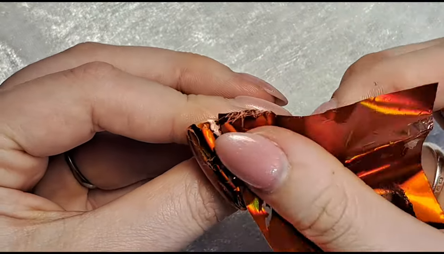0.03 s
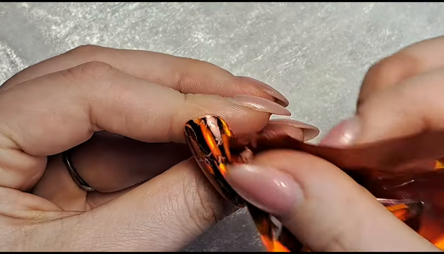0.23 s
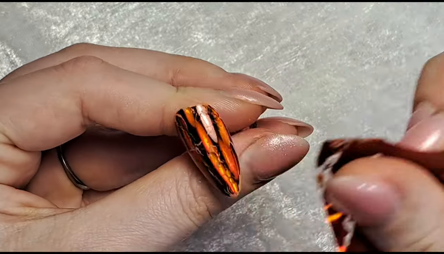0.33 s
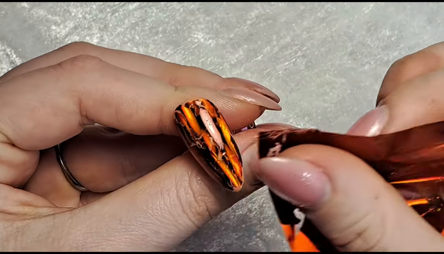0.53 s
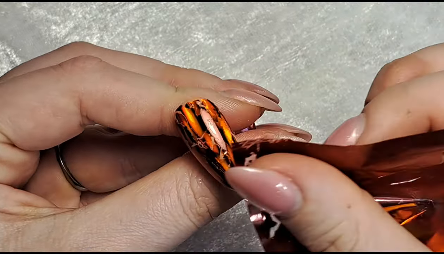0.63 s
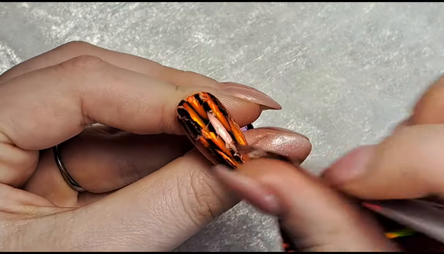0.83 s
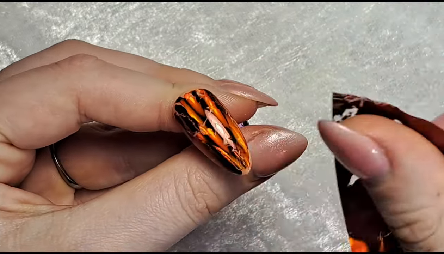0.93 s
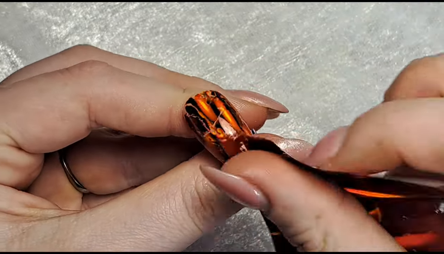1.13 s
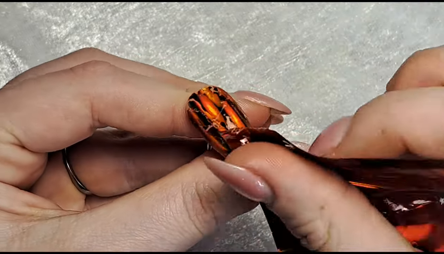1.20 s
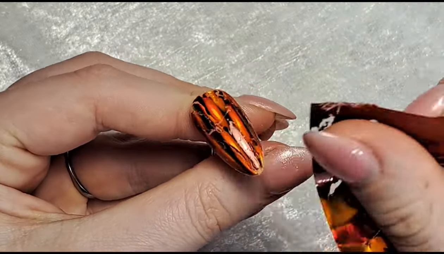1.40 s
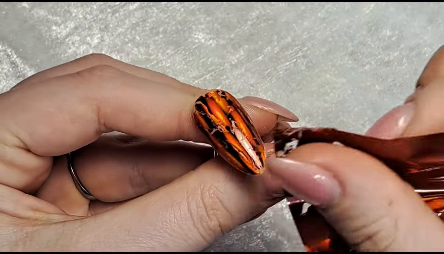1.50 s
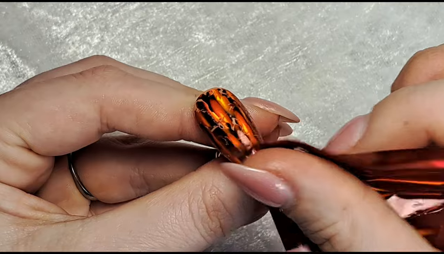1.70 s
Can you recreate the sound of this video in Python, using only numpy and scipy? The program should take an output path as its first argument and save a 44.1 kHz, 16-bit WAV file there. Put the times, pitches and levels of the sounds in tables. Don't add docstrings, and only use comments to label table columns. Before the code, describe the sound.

A thin foil strip crackles very close to a stereo microphone, pressed and lifted from a fingernail in three rounds; the first burst is loudest, later snaps are sparser, over faint hiss and low hum.

```python
import sys
import numpy as np
from scipy import signal
from scipy.fft import rfft, irfft, next_fast_len
from scipy.io import wavfile
from scipy.ndimage import uniform_filter1d, minimum_filter1d

SR = 44100
rng = np.random.default_rng(int(sys.argv[2]) if len(sys.argv) > 2 else 0)


def to_wav(s):
    ch = np.atleast_2d(s).T
    pcm = np.round(np.clip(ch, -1, 1) * 32767)
    wavfile.write(sys.argv[1], SR, pcm.astype(np.int16))


def level_to_linear(level):
    exponent = np.asarray(level, float) / 20
    return 10 ** exponent


N = 77175

# (peak time [s], peak rms level [dB], fall [ms], bass tilt
# [dB/octave])
FOIL_CREASES = [(0.0068, -49.5, 3.3, -1.5), (0.0114, -52, 1.7, -3), (0.0277, -55.5, 0.97, -1),
                (0.0882, -53, 2.8, 2.1), (0.1163, -49.5, 1.3, 1), (0.1223, -57, 1.0, -10),
                (0.1298, -43, 1.7, -1), (0.1811, -56, 0.8, -16), (0.1887, -42, 1.8, -4),
                (0.2033, -50, 1.4, 2.8), (0.2288, -38, 2.5, -1.3), (0.2314, -30, 1.5, 0.5),
                (0.2886, -45, 1.2, 4), (0.2972, -51, 0.78, -2), (0.3299, -29.5, 1.07, -0.5),
                (0.3332, -31, 1.6, 2.5), (0.3417, -30.5, 1.2, 4), (0.3447, -30.5, 2.8, 4),
                (0.3487, -36, 2, 8), (0.3558, -33, 3.7, 3.5), (0.3598, -23.8, 2.5, -3.5),
                (0.362, -20.5, 0.94, 1.72), (0.3654, -28, 0.45, 1.96), (0.469, -48, 2.5, 3),
                (0.5443, -57.1, 0.37, 3.8), (0.5972, -57, 1.5, 3.2), (0.645, -62, 0.41, 7),
                (0.7336, -44.5, 1.43, 0), (0.8283, -49, 2.8, -0.3), (0.8365, -37, 1.5, -6),
                 (0.8426, -40.5, 2.5, 3.3), (0.8444, -36, 0.26, -1.5), (0.896, -43, 0.69, -10),
                 (0.9192, -60, 0.59, -6), (0.935, -40, 2.3, -7), (0.9437, -49, 1.8, 1.5),
                 (0.9529, -29.5, 2.5, -4.5), (0.9756, -35.5, 2.1, 0.1), (1.0113, -47.5, 1.2, 2.8),
                 (1.0184, -41, 2.1, -1.5), (1.083, -50, 2.2, 1.2), (1.1075, -37, 1.0, -3.5),
                 (1.1107, -34, 0.64, -4.5), (1.1186, -44.5, 1.1, 2.9), (1.15, -54, 1.3, 3.5),
                 (1.165, -50, 0.85, -6),
                (1.248, -53.5, 2.2, -13), (1.2565, -58, 2.5, 1), (1.26, -37.5, 1.7, -4),
                (1.2625, -37.5, 0.9, 0.5), (1.2674, -44.5, 3.2, 2.5), (1.2771, -43, 3.1, -4),
                (1.3536, -42.5, 1.9, 0.2), (1.361, -45.2, 1.0, -9), (1.368, -48, 2.5, 1),
                (1.3735, -32, 0.73, -4), (1.3761, -38, 1.7, 0.1), (1.3939, -35, 2.3, -2),
                (1.3942, -36.5, 2.9, -3.5), (1.398, -32.5, 0.99, 0.5), (1.4033, -40, 1.2, 2),
                (1.53, -60.5, 0.7, 2), (1.674, -55, 3, 2.5), (1.6762, -38, 1.26, -3),
                (1.7181, -41.5, 4.6, 0.5), (1.7213, -40.5, 0.7, -5), (1.7307, -47.5, 1, -1),
                (1.7374, -33, 0.79, -7.5), (1.415, -45.5, 1.1, 2.7), (1.424, -45, 1.1, -2),
                (1.4715, -55, 1.2, -1), (1.748, -54, 1.1, -6)]
# (frequency [Hz], level [dB])
FILM_COLOUR = [(110, -33.5), (380, -8.5), (1000, -6), (1900, -9), (2800, -2.5), (3600, -2), (6000, 2.5),
               (12500, 3.5), (16000, 2.5)]
# (time [s], level [dB])
HANDLING_EFFORT = [(0, -54.5), (.07, -70), (.2, -60.5), (.31, -47), (.37, -40), (.5, -68.5), (.62, -77),
                   (.72, -76.5), (.815, -62), (.85, -58), (.96, -54), (1.06, -68), (1.22, -76), (1.28, -49),
                   (1.345, -64.5), (1.43, -61), (1.52, -69), (1.66, -89), (1.7, -54), (1.75, -65)]
# (time [s], pitch [Hz], level [dB])
FINGER_SQUEAK = [(.55, 1390, -88), (0.619, 1401, -79), (0.801, 1331, -86), (0.849, 1343, -78),
                 (.92, 1405, -71.5), (.98, 1280, -69.5), (1.041, 1386, -70.5), (1.1, 1394, -69),
                 (1.2, 1407, -85), (1.25, 1400, -115)]
# (frequency [Hz], level difference [dB])
LEFT_OVER_RIGHT = [(300, 1.5), (1000, -3.5), (2500, -7.5), (5000, -2.5), (9000, 0), (14000, 6.5)]
# (frequency [Hz], 60 dB decay time [s])
ROOM_DECAY = [(300, 0.42), (800, 0.19), (2100, 0.25), (5500, 0.19), (14600, 0.11)]
# (time [s], level [dB])
TABLE_RUMBLE = [(0.0, -75.5), (0.258, -63), (0.292, -76), (0.36, -61), (0.57, -67.5), (0.988, -57),
                (1.048, -65.5), (1.666, -69), (1.75, -64.5)]
# (frequency [Hz], width [Hz], level [dB])
TABLE_MODES = [(154.5, 26, -75), (202.7, 12.8, -78), (261.8, 64, -73), (299.6, 21.3, -77)]
# (frequency [Hz], level [dB])
LOW_NOISE = [(12, -40), (20, -26), (42, -11.5), (59, -9.5), (122, -12), (157, -25.5), (214, -3.5),
             (238, -19.5), (450, -84), (580, -88), (990, -120)]
# (frequency [Hz], level [dB])
HISS = [(210, -36), (350, -6), (411, -15), (804, -19), (1820, -24.5), (9000, -32.5), (12000, -20),
        (16000, -35)]


def at_hz(points, hz):
    table_hz, values = np.transpose(points)
    return np.interp(np.log(np.maximum(hz, 1)), np.log(table_hz), values)


def in_time(rows):
    s, values = np.transpose(rows)
    return np.interp(np.arange(N) / SR, s, values)


def rms_one(x):
    return x / np.sqrt(np.mean(x ** 2) + 1e-20)


def film(clicks, tilt_db, ripple_db):
    size = 2 * next_fast_len(len(clicks) // 2 + 512)
    hz = np.arange(size // 2 + 1) * SR / size
    patches_db = np.interp(np.sqrt(hz), np.linspace(0, np.sqrt(SR / 2), len(ripple_db)), ripple_db)
    octaves = np.log2(np.clip(hz, 900.0, 12000.0) / 8000)
    db = at_hz(FILM_COLOUR, hz) - 0.75 * tilt_db * octaves + patches_db
    both_sides_db = np.r_[db, db[-2:0:-1]]
    log_response = np.conj(signal.hilbert(both_sides_db)[:hz.size]) * np.log(10) / 20
    return irfft(rfft(clicks, size) * np.exp(log_response), size)[:len(clicks)]


def click_swarm(ms, fall_ms):
    clicks_per_ms, size_spread_db = 30.0, 1.5
    rise_share, longest_fall_ms = 0.55, 2.2
    echo_ms, echo_share = 0.71, 0.4
    present = rng.random(ms.size) < clicks_per_ms * 1000 / SR
    size_db = size_spread_db * np.minimum(rng.exponential(1, ms.size), 3.0)
    swarm = present * level_to_linear(size_db) * rng.choice([-1, 1], ms.size)
    fall_ms = np.clip(fall_ms, 0.3, longest_fall_ms)
    slope_ms = fall_ms * np.where(ms < 0, rise_share, 1)
    swarm = swarm * np.exp(-np.abs(ms / slope_ms) ** 1.25)
    return swarm + echo_share * np.roll(swarm, int(echo_ms * SR / 1000))


def creases():
    snap_db, pan_spread_db, lag_spread_samples = 2.5, 1.5, 1.3
    patch_count, near_ripple_db, far_ripple_db = 30, 2.2, 3.8
    before = 256
    span = np.arange(1024)
    ms = (span - before) / SR * 1000
    near, far = np.zeros((2, N + 1024)), np.zeros(N + 1024)
    for s, db, fall_ms, tilt_db in FOIL_CREASES:
        swarm = click_swarm(ms, fall_ms)
        snap = film(swarm, tilt_db, near_ripple_db * rng.standard_normal(patch_count))
        peak_rms = np.sqrt(uniform_filter1d(snap ** 2, size=30).max())
        snap = level_to_linear(db + snap_db) * snap / peak_rms
        pan_db, lag = rng.standard_normal(2) * [pan_spread_db, lag_spread_samples]
        at = int(s * SR) - before + span
        near[0, at] += level_to_linear(pan_db / 2) * snap
        near[1, at] += level_to_linear(-pan_db / 2) * np.roll(snap, int(round(lag)))
        one_click = 1.0 * (ms == 0)
        sent = film(one_click, tilt_db, far_ripple_db * rng.standard_normal(patch_count))
        far[at] += rms_one(sent) * np.sqrt(np.mean(snap ** 2))
    return near[:, :N], far[:N]


def crackle():
    ticks_per_s, spread_db = 2500, 3.5
    size_db = spread_db * np.minimum(rng.exponential(1, N), 4.0)
    sizes = level_to_linear(size_db) * rng.choice([-1, 1], N)
    ticks = sizes * (rng.random(N) < ticks_per_s / SR)
    return level_to_linear(in_time(HANDLING_EFFORT)) * rms_one(film(ticks, 0, np.zeros(2)))


def squeak():
    wobble_hz = 48
    s, hz, db = np.transpose(FINGER_SQUEAK)
    t = np.arange(N) / SR
    slow = signal.butter(2, wobble_hz, fs=SR, output="sos")
    flutter = signal.sosfilt(slow, rng.standard_normal((2, N)))
    turn = np.exp(2j * np.pi * np.cumsum(np.interp(t, s, hz)) / SR)
    wobble = 1 + 0.92 * rms_one(flutter[0]) + 0.7j * rms_one(flutter[1])
    return level_to_linear(np.interp(t, s, db)) * rms_one(np.real(turn * wobble))


def ports(x):
    lag_samples = 1.55
    size = next_fast_len(N + 64)
    hz = np.arange(size // 2 + 1) * SR / size
    side = np.array([[0.5], [-0.5]])
    shift = np.exp(2j * np.pi * hz / SR * side * lag_samples)
    response = level_to_linear(side * at_hz(LEFT_OVER_RIGHT, hz)) * shift
    return irfft(rfft(x, size) * response, size)[:, :N]


def pair(alike):
    mid, side = rng.standard_normal((2, N))
    alike = np.clip(alike, 0, 1)
    return np.sqrt(1 + alike) * mid + np.sqrt(1 - alike) * side * [[1], [-1]]


def room(x):
    gap_s, late_db, late_t60_s, lowest_hz = 0.003, -21.5, 0.48, 150
    length = SR // 2
    t = np.arange(length) / SR
    noise = rfft(pair(0.1)[:, :length])
    octave = np.log2(np.arange(1, SR // 4 + 2) * 2 / lowest_hz)
    late = level_to_linear(late_db - 60 * t / late_t60_s)
    tail = 0
    for k in range(8):
        band = irfft(noise * np.clip(1 - np.abs(octave - k), 0, 1), length)
        decay = level_to_linear(-60 * t / at_hz(ROOM_DECAY, lowest_hz * 2 ** k))
        tail = tail + band * (decay + late)
    tail = tail * np.clip(t / gap_s - 0.5, 0, 1)
    tail = tail / np.sqrt(np.sum(tail ** 2) / 2)
    return signal.fftconvolve(x[None], tail, axes=1)[:, :N]


def resonate(x, hz, width_hz):
    r = np.exp(-np.pi * width_hz / SR)
    poles = [1, -2 * r * np.cos(2 * np.pi * hz / SR), r * r]
    return signal.lfilter([(1 - r * r) / 2, 0, (r * r - 1) / 2], poles, x + 1e-18)


def coloured(x, spectrum):
    hz = np.arange(N // 2 + 1) * SR / N
    inside = (hz > spectrum[0][0]) & (hz < spectrum[-1][0])
    return rms_one(irfft(rfft(x) * level_to_linear(at_hz(spectrum, hz)) * inside, N))


def table():
    low_alike = 0.82
    knock_s, knock_length_s, knock_hz, knock_db = 0.865, 0.07, 154, -60
    modes = 0
    for hz, width_hz, db in TABLE_MODES:
        mode = resonate(resonate(pair(low_alike), hz, width_hz), hz, width_hz)
        modes = modes + level_to_linear(db) * rms_one(mode)
    swell_db = in_time(TABLE_RUMBLE)
    t = np.arange(N) / SR
    swell = np.exp(-((t - knock_s) / knock_length_s) ** 2)
    knock = level_to_linear(knock_db) * swell * np.sin(2 * np.pi * knock_hz * t)
    return modes * level_to_linear(swell_db - swell_db.mean()) + knock


def background():
    low_db, low_lean_db, low_alike = -73, -5.5, 0.82
    hiss_db, hiss_alike = -72.5, 0.13
    side = np.array([[0.5], [-0.5]])
    low = level_to_linear(low_db + low_lean_db * side) * coloured(pair(low_alike), LOW_NOISE)
    return low + level_to_linear(hiss_db) * coloured(pair(hiss_alike), HISS)


def dip(x):
    above_hz, ahead_s, from_db, share = 3500, 0.012, 9.5, 0.27
    top = signal.sosfiltfilt(signal.butter(2, above_hz, "high", fs=SR, output="sos"), x)
    db = 10 * np.log10(uniform_filter1d(np.mean(top ** 2, axis=0), size=130) + 1e-12)
    ahead = int(ahead_s * SR)
    coming_db = -minimum_filter1d(-db, size=ahead, origin=-(ahead // 2))
    loss_db = share * np.clip(coming_db - db - from_db, 0, None)
    return x - top * (1 - level_to_linear(-uniform_filter1d(loss_db, size=40)))


def scene():
    near, far = creases()
    fine = crackle()
    close = ports(near + fine) + ports(squeak())
    return close + level_to_linear(-2.2) * room(far + fine) + table() + background()


def top_cut(x):
    return signal.sosfilt(signal.butter(12, 16550, fs=SR, output="sos"), x)


def record(dry):
    low_pass = signal.cheby2(16, 45, 15800, fs=SR, output="sos")
    mix = signal.sosfilt(low_pass, dip(dry))
    return top_cut(mix)


dry = scene()
out = record(dry)
to_wav(out)
```